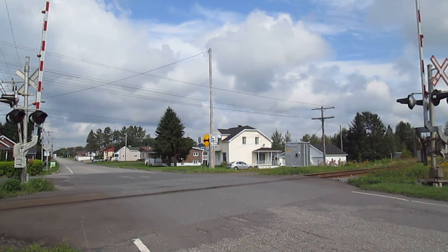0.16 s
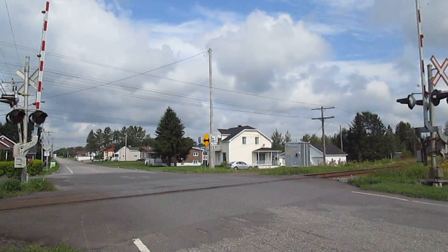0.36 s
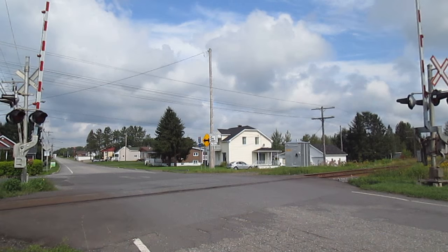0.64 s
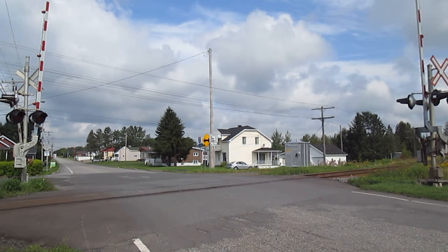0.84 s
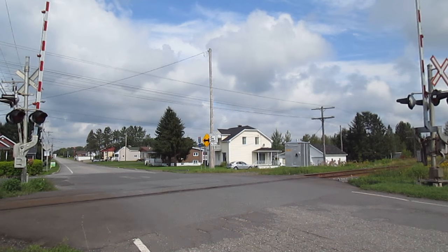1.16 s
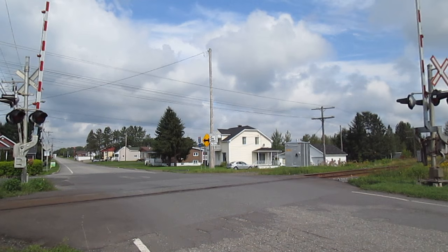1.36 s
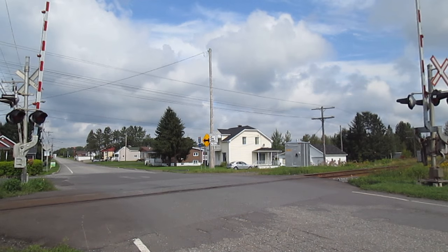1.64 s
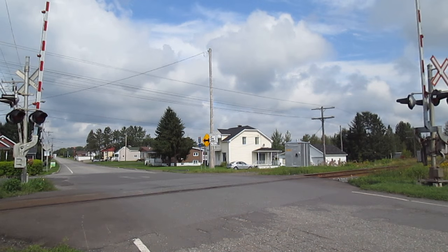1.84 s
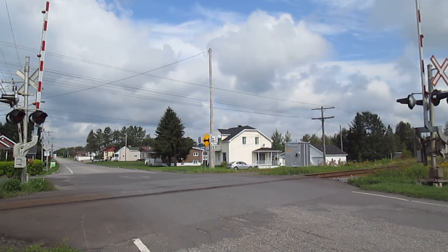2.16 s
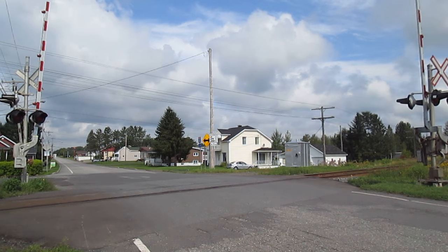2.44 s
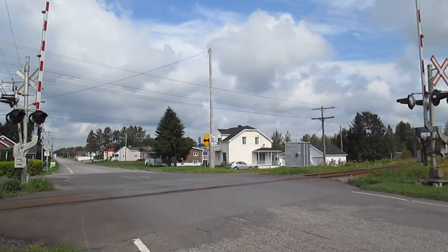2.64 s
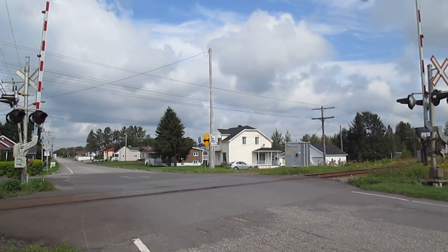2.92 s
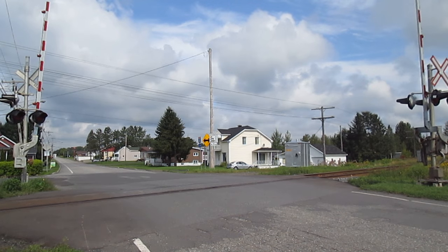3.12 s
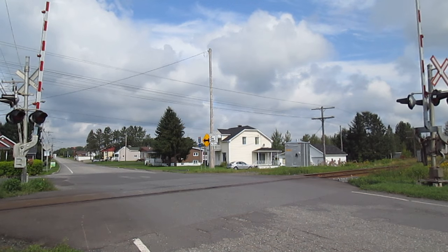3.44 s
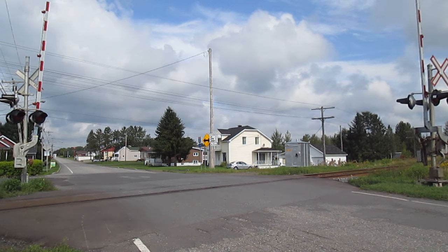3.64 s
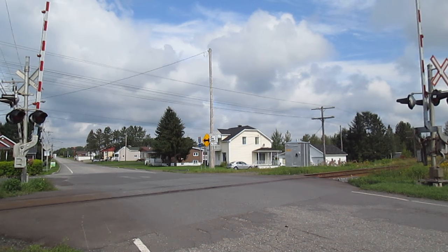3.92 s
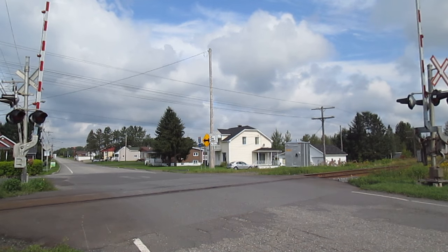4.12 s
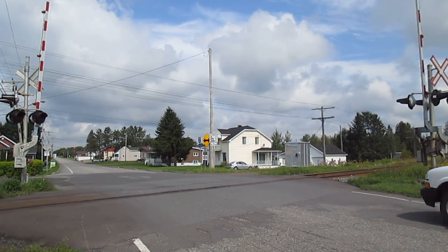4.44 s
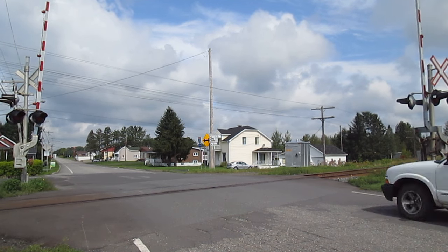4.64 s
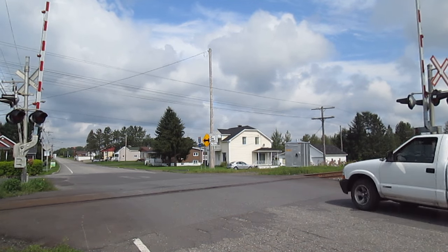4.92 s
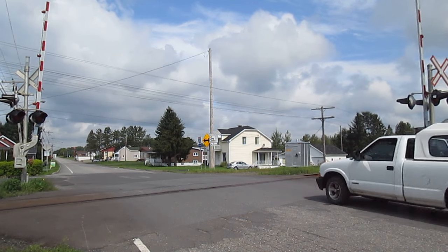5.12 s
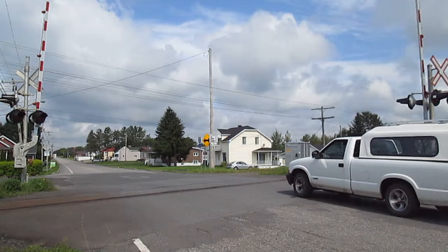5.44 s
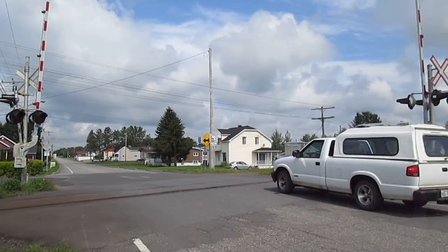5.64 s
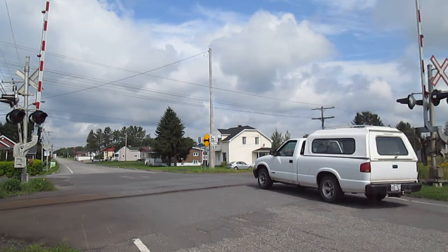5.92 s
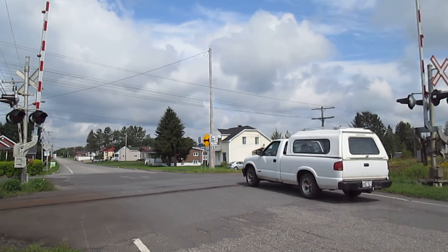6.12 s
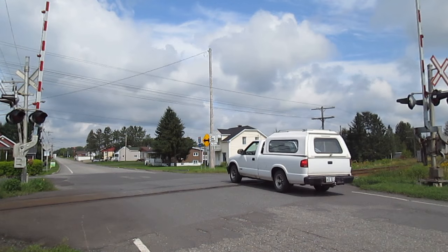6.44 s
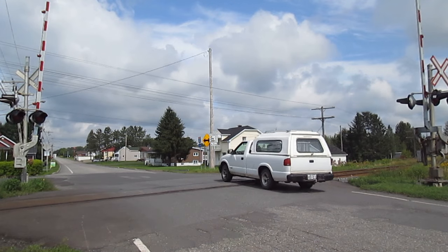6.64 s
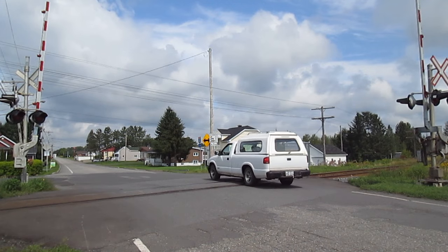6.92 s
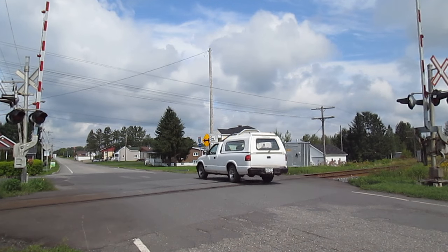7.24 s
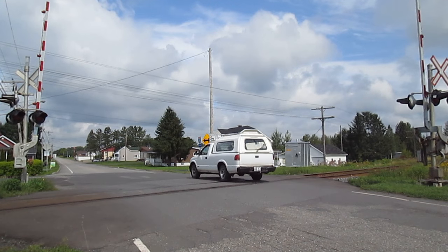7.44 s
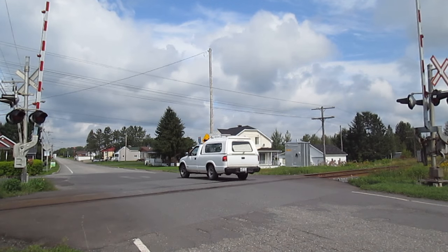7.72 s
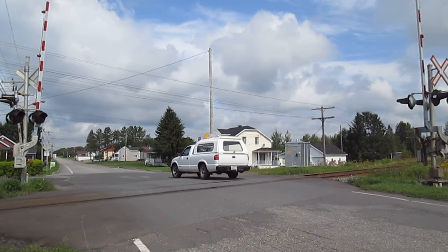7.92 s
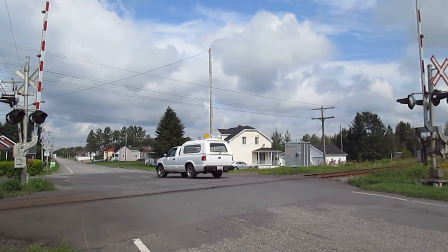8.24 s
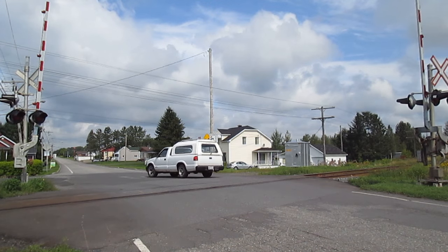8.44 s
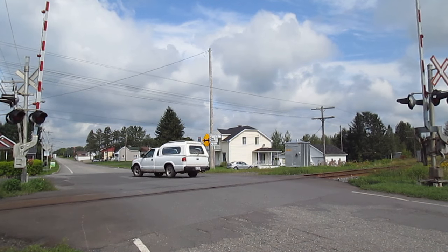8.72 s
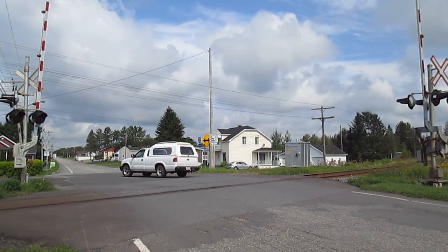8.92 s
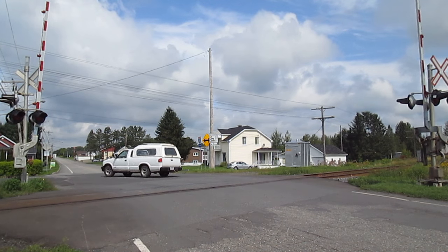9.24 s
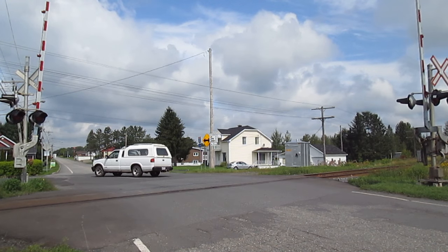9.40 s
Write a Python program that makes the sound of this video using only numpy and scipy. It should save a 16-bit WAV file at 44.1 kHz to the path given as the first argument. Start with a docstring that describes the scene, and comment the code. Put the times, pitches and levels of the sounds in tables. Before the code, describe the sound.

A stationary microphone by a country road catches low buffeting gusts, faint distant traffic and a constant nearby engine hum. A pickup truck rolls by from close range: broad tyre roar, a sinking fuzzy whirr, then a low uneven exhaust burble with renewed throttle. It fades away with dry clicks of flicked stones, a late small tyre swell and a new approaching hiss.

```python
"""Pickup at a rural level crossing

A pickup rolls slowly past and pulls away over the rails: its tyres are shaped noise that swells and
fades, with flicked stones as short rings, and its engine is a burbling stack of crank orders.
A second engine drones nearby as steady partials, and bursts of low noise are gusts on the microphone.
At the end the tyre hiss of another vehicle fades in."""
import sys
import numpy as np
from scipy import signal
from scipy.fft import rfft, irfft, next_fast_len
from scipy.io import wavfile
from scipy.ndimage import uniform_filter1d

SR = 44100
rng = np.random.default_rng(int(sys.argv[2]) if len(sys.argv) > 2 else 0)


def pcm_store(signal):
    """Save signal as 16-bit PCM."""
    levels = np.round(np.clip(np.atleast_2d(signal), -1, 1) * 32767)
    wavfile.write(sys.argv[1], SR, levels.astype(np.int16).T)


N = 422037

# swells of the tyres as the truck rolls up, nears the rails and gathers speed beyond them:
# loudest_s, half_width_s, roar_db, howl_db
TYRE_SWELLS = [(3.3, 1.42, -37.5, -39), (5.45, .3, -51, -50.5), (8.5, 0.16, -58, -41),
               (9.3, 0.42, -46, -42.5)]


def amp(db):
    """Decibels to gain."""
    return 10 ** (np.asarray(db) / 20)


def unit(x):
    """Scales to an rms of 1."""
    return x / np.sqrt(np.mean(x ** 2) + 1e-20)


def follow(rows):
    """Draws each column of a breakpoint curve at every sample; the first column is time in s."""
    s, *columns = np.transpose(rows)
    return [np.interp(np.arange(N) / SR, s, column) for column in columns]


def add(mix, s, sound):
    """Mixes a sound in at s seconds."""
    part = mix[max(round(s * SR), 0):][:len(sound)]
    part += sound[:len(part)]


def noise(gain):
    """Noise of rms 1 whose spectrum is the function gain(Hz)."""
    size = next_fast_len(N, True)
    spectrum = rfft(rng.standard_normal(size)) * gain(np.fft.rfftfreq(size, 1 / SR))
    return unit(irfft(spectrum, size)[:N])


def coloured(points):
    """Noise of rms 1 with a spectrum drawn through (Hz, dB) points."""
    hz, db = np.transpose(points)
    return noise(lambda f: amp(np.interp(np.log(f + 1), np.log(hz + 1), db)))


def resonant(modes):
    """Noise of rms 1 shaped by (Hz, width Hz, dB) resonances."""
    def gain(f):
        return sum(amp(db) / (1 + ((f - hz) / width) ** 2) ** 1.5 for hz, width, db in modes)
    return noise(gain)


def drift(per_s):
    """Slow random wandering with an rms of 1."""
    return noise(lambda f: np.exp(-(f / per_s) ** 2) * (f > 0))


def below(x, hz):
    """The part of a sound under hz, filtered without delay."""
    return signal.sosfiltfilt(signal.butter(2, hz, fs=SR, output="sos"), x)


def passing(nearest_s, width_s):
    """Gain of something that goes by in a straight line: one over its distance."""
    return 1 / np.hypot(1, (np.arange(N) / SR - nearest_s) / width_s)


def change(at_s, over_s):
    """A smooth step from 0 to 1, centred on at_s."""
    return .5 + .5 * np.tanh((np.arange(N) / SR - at_s) / over_s)


def gliding(centre_hz, width_hz):
    """Noise in one band that follows a pitch curve: two slow noises modulate a cosine and a sine."""
    phase = 2 * np.pi * np.cumsum(centre_hz) / SR
    a, b = (noise(lambda f: 1 / (1 + (f / width_hz) ** 2) ** 2) for _ in range(2))
    return a * np.cos(phase) + b * np.sin(phase)


def tyres(split_hz=1700, traffic_db=-41.5, hiss_db=-37.5, hiss_follows=0.44, flutter_db=0.38):
    """Tread roar near 1 kHz swells over steady far traffic; its hiss swells less, and both flutter."""
    # spectrum of the roar and the traffic behind it: pitch_hz, level_db (per Hz)
    roar = [(20, 8), (35, 3), (100, 3.5), (180, 5.5), (250, 5.5), (370, 1.5), (680, 0.5), (850, -0.5),
            (1080, -3.5), (1450, -10), (2100, -14), (4000, -27), (6500, -39.5), (8400, -42.5), (10500, -50),
            (15500, -59.5)]
    power = amp(traffic_db) ** 2
    for loudest_s, width_s, roar_db, _ in TYRE_SWELLS:
        power = power + (amp(roar_db) * passing(loudest_s, width_s)) ** 2
    level = np.sqrt(power)
    road = coloured(roar)
    road /= np.std(below(road, 1500) - below(road, 450))  # levels refer to the band around 1 kHz
    body = below(road, split_hz)
    hiss = (road - body) * amp(hiss_db) * unit(level) ** hiss_follows
    return (body * level + hiss) * amp(flutter_db * drift(26))


def tread(width_hz=380):
    """The wedge between tyre and road is a horn; its hollow peak shifts with angle and distance."""
    # pitch of the howl: time_s, centre_hz
    howl = [(0, 850), (2.2, 1030), (3.6, 960), (4.5, 1130), (6.3, 1220), (7, 960), (8.5, 950), (9.57, 1110)]
    centre_hz, = follow(howl)
    power = sum((amp(howl_db) * passing(loudest_s, width_s)) ** 2
                for loudest_s, width_s, _, howl_db in TYRE_SWELLS)
    return np.sqrt(power) * gliding(centre_hz, width_hz)


def truck_front(hiss_width_hz=1800):
    """Fan and front tyres hiss forwards, fading as the bonnet passes; one band of hiss glides."""
    # resonances of the truck's front: pitch_hz, width_hz, level_db (relative)
    front = [(1830, 420, 7), (2510, 800, -1), (3600, 860, -20), (6200, 1200, -19.5), (9500, 1500, -32.5)]
    # front tyre hiss, shifting with the angle to the truck: time_s, centre_hz, level_db
    tyre_hiss = [(0, 7030, -87), (.65, 6770, -69), (1.4, 5900, -75), (2, 5300, -67), (2.45, 4870, -61.5),
                 (2.9, 3980, -62), (3.4, 3815, -63), (3.9, 4560, -76), (4.6, 7385, -73), (5.3, 7400, -88)]
    facing = 1 - change(at_s=3.4, over_s=0.55)  # the bonnet swings past
    fan = amp(-46) * passing(nearest_s=2.27, width_s=1.07) * facing * resonant(front)
    centre_hz, hiss_db = follow(tyre_hiss)
    return fan + amp(hiss_db) * gliding(centre_hz, hiss_width_hz)


def whirr(width_hz=52):
    """A fuzzy narrow tone from the truck, sinking overall in pitch as it goes by."""
    # the whirr's glide: time_s, centre_hz, level_db
    whirr_curve = [(0, 536, -66), (1.4, 542, -59), (2, 525, -42), (2.45, 499, -40), (3, 496, -48),
                   (3.5, 470.6, -41), (4.2, 495.4, -51), (4.7, 467, -49), (5.4, 453, -62)]
    centre_hz, level_db = follow(whirr_curve)
    return amp(level_db) * gliding(centre_hz, width_hz)


def pickup_engine(wander=0.0033, rough=0.31, level_db=-33):
    """Exhaust orders follow the crank; load shifts their balance, and the body shades them at the end."""
    # engine speed: time_s, crank_hz (turns per second)
    engine_speed = [(0, 34.7), (1, 32.3), (1.7, 30), (2.3, 34.7), (2.8, 32.6), (3.5, 33), (4, 35.3),
                    (4.6, 34.7), (5.05, 34), (5.3, 36.7), (6, 39), (6.6, 32.2), (7.4, 32), (8.3, 26),
                    (9.57, 32.5)]
    # exhaust orders: crank_multiple, coasting_db, half_load_db, pulling_db (relative)
    exhaust = [(1, -8, -10, -9), (1.5, -1, -6, -12), (2, -10, -5, 3.5), (2.5, -9, -21, -12),
               (3, -3, -2, -14), (4, -13.5, -14, -21), (5, -12.5, -13.5, -23), (6, -11, -12.5, -1),
               (7, -6.5, -9.5, -11), (9, -12, -22, -32), (14, -23, -14.5, -20), (15, -16, -29, -30)]
    coast_load, throttle_load = 0.049, 0.37  # on a scale where 1 is pulling
    load_per_accel = 0.086  # load per (turn per s) gained each second

    crank_hz, = follow(engine_speed)
    accel = uniform_filter1d(np.gradient(crank_hz) * SR, SR // 4)
    throttle = change(at_s=2.97, over_s=0.23)  # the driver stops coasting
    load = coast_load + throttle_load * throttle + load_per_accel * np.maximum(accel, 0)
    shade_db = -2 * change(at_s=7.8, over_s=0.35)  # the tail turns to the microphone
    turns = np.cumsum(crank_hz * (1 + wander * drift(5.0))) / SR
    out = np.zeros(N)
    # half orders occur because a four-stroke cycle takes two turns
    for order, *order_db in exhaust:
        balance_db = np.interp(load, [0, .5, 1], order_db)
        shaded_db = balance_db + shade_db * (order >= 2)  # the deepest orders pass unshaded
        gain = amp(shaded_db) * (1 + rough * drift(4.6))
        out += gain * np.sin(2 * np.pi * (order * turns + rng.random()))
    return np.sqrt(2) * amp(level_db) * passing(nearest_s=4.1, width_s=1.75) * out


def stones(scatter_db=-7, scatter_t60=0.07, grit_db=-3, grit_t60=.02):
    """Stones ring and knock with a crunch of grit; road and underbody scatter each snap (t60 in s)."""
    # stones and their bounces: start_s, level_db, ring_hz, ring_t60_s, knock_db (relative to the ring)
    stone_hits = [(6.5522, -29, 3280, .011, 1.5), (6.5545, -35, 3150, .008, 1),
                  (6.5597, -32, 2800, .008, -4), (6.563, -41, 3900, .012, 4), (6.5692, -39, 2100, .014, 1),
                  (7.2703, -37.5, 3680, .02, -3), (7.2735, -39, 2450, .015, -2),
                  (7.903, -39, 3800, .01, -10), (7.9572, -33, 2900, .008, -8), (8.283, -40, 3500, .01, -8),
                  (8.326, -23, 2750, .007, -16), (8.3295, -35, 3150, .009, -8),
                  (8.507, -24.5, 3350, .005, -10), (8.5082, -26, 950, .025, -22),
                  (8.5113, -35, 3450, .007, -8)]
    # knock of a stone on the ground: pitch_hz, level_db (relative), t60_s
    ground_knock = [(950, 1, .011), (1300, 1, .01), (1850, 0, .014), (2450, -5, .007), (4300, -18, .005),
                    (5700, -23, .012)]
    out, t = np.zeros(N), np.arange(SR // 6) / SR
    attack = 1 - np.exp(-(t / .0006) ** 2)
    grit_band = signal.butter(2, [1000, 4000], "bandpass", fs=SR, output="sos")
    for start_s, level_db, ring_hz, ring_t60, knock_db in stone_hits:
        modes = [(ring_hz, 0, ring_t60)]
        modes += [(hz, db + knock_db, t60) for hz, db, t60 in ground_knock]
        ringing = sum(amp(db - 60 * t / t60) * np.sin(2 * np.pi * (hz * t + rng.random()))
                      for hz, db, t60 in modes)
        crunch = unit(signal.sosfilt(grit_band, rng.standard_normal(len(t))))
        grit = amp(knock_db + grit_db - 60 * t / grit_t60) * crunch
        snap = attack * (grit + ringing)
        # scattered echoes start 3 ms after the snap
        echoes = rng.standard_normal(len(t)) * amp(-60 * t / scatter_t60) * (t > .003)
        tail = signal.fftconvolve(snap, echoes / np.linalg.norm(echoes))[:len(t)]
        add(out, start_s, amp(level_db) * (snap + amp(scatter_db) * tail))
    return out


def next_vehicle():
    """The tyres of a second vehicle begin to hiss as it draws near: shaped noise fading in."""
    # spectrum of its tyre hiss: pitch_hz, level_db (per Hz)
    next_hiss = [(100, -18), (900, 7), (2200, 4), (4000, -10), (5500, -13.5), (8000, -28), (15000, -38)]
    return amp(-43.5) * change(at_s=9.45, over_s=0.24) * coloured(next_hiss)


def idling_engine(firing_hz=68.85, wander=0.001, waver_db=1.23):
    """A steady drone of firing-rate harmonics whose levels waver in the moving air."""
    # harmonics of the idle: firing_multiple, level_db (before wavering)
    idle = [(1, -45), (2, -49.5), (3, -40), (4, -47), (5, -56), (6, -46.5), (7, -53), (16, -68)]
    firings = np.cumsum(firing_hz * (1 + wander * drift(3.35))) / SR
    out = np.zeros(N)
    for multiple, level_db in idle:
        gain = amp(level_db + waver_db * drift(10.7))
        out += gain * np.sin(2 * np.pi * (multiple * firings + rng.random()))
    return np.sqrt(2) * out


def wind(gust_trim_db=-2.6, large_hz=55, middle_hz=140, small_hz=170, lump_db=0.14, puff_db=1.2):
    """Eddies rumble on the microphone; each gust is a short lump of large, middle and small ones."""
    # gusts: peak_s, rise_s (and equal fall), large_db, middle_db, small_db (before gust_trim_db)
    gusts = [(.39, 0.062, -39, -20, -32), (0.459, 0.05, -35, -22, -26.5), (.75, 0.11, -30, -25, -37),
             (.94, 0.094, -33, -27, -25.5), (1.11, 0.1, -25, -33, -35), (1.26, 0.076, -28, -31, -35),
             (1.6, 0.058, -21.5, -37, -33), (1.665, 0.043, -25, -26, -31), (1.735, 0.078, -31, -22, -23),
             (1.8, .05, -32, -27, -29.5), (2, 0.14, -28, -30, -33), (2.46, 0.092, -31, -20.5, -32),
             (2.63, .08, -32, -25.5, -35), (2.77, 0.15, -25, -24, -37), (2.93, .09, -25, -22.5, -25.5),
             (3.02, .06, -28, -24.5, -35), (3.19, 0.11, -33, -21, -34), (3.27, .06, -26.5, -35, -34),
             (3.54, .09, -33, -22.5, -34), (3.63, .07, -35, -28, -25.5), (3.76, 0.081, -24, -21.5, -28),
             (3.93, 0.066, -33, -19, -32), (4.11, 0.084, -23, -21.5, -30), (4.23, 0.076, -24, -33, -31),
             (4.34, 0.092, -26, -24.5, -42), (4.5, 0.11, -22, -26.5, -25.5), (4.68, .08, -37, -29, -37),
             (4.9, 0.091, -34, -22.5, -39), (5.13, 0.05, -26, -18.5, -34.5), (5.2, 0.06, -34, -26, -37),
             (5.32, .07, -40, -26, -45), (5.46, .06, -27, -41, -32), (5.93, 0.12, -25.5, -22, -34),
             (6.06, 0.074, -29, -22, -34), (6.16, 0.078, -25, -21.5, -37), (6.27, 0.076, -29, -21, -31),
             (6.7, 0.066, -40, -29, -40), (6.82, 0.068, -37, -28, -31), (7.06, 0.12, -38, -32, -36),
             (7.28, 0.19, -37, -30.5, -35), (7.62, .17, -29.5, -35.5, -35), (9.461, 0.15, -35, -34.5, -44)]
    # spectrum of wind rumble: pitch_hz, level_db (per Hz)
    buffet = [(12, -17), (25, -2), (45, 1.5), (80, 2), (125, 0), (180, -7), (260, -13), (400, -23.5),
              (900, -51.5), (3000, -88)]
    lull_db = -3.5 * change(at_s=6.9, over_s=.1)  # the wind drops
    breeze_db = -34.5 + lull_db + puff_db * drift(2.3)
    out = amp(breeze_db) * passing(nearest_s=2.1, width_s=6.6) * coloured(buffet)

    a, b, c = (coloured(buffet) for _ in range(3))
    large = below(a, large_hz)
    middle = below(b - below(b, large_hz), middle_hz)
    small = c - below(c, small_hz)
    t = np.arange(N) / SR
    for peak_s, rise_s, *levels_db in gusts:
        near = abs(t - peak_s) < rise_s
        swell = np.cos(np.pi / 2 * (t[near] - peak_s) / rise_s) ** 2
        swell_rms = np.sqrt(np.mean(swell ** 2))
        for eddy, level_db in zip((large, middle, small), levels_db):
            out[near] += amp(level_db + gust_trim_db) * swell_rms * unit(swell * eddy[near])
    return out * amp(lump_db * drift(23))


def scene():
    """Everything meets at one microphone."""
    truck = tyres() + tread() + truck_front() + whirr() + pickup_engine() + stones()
    return (truck + next_vehicle() + idling_engine() + wind())[None]


def record(dry, dip_depth=0.44, edge_hz=15720):
    """A slight dip near 7.8 kHz, and nothing above about 15.7 kHz."""
    without_band = signal.lfilter(*signal.iirnotch(7830, 22, SR), dry)
    sound = dry + dip_depth * (without_band - dry)
    low_pass = signal.firwin(1023, edge_hz, window=("kaiser", 9), fs=SR)
    return signal.oaconvolve(sound, low_pass[None], "same")


dry = scene()
out = record(dry)
pcm_store(out)
```